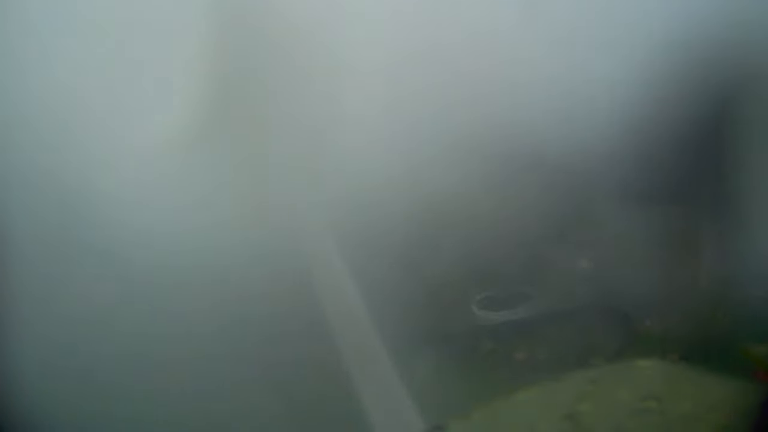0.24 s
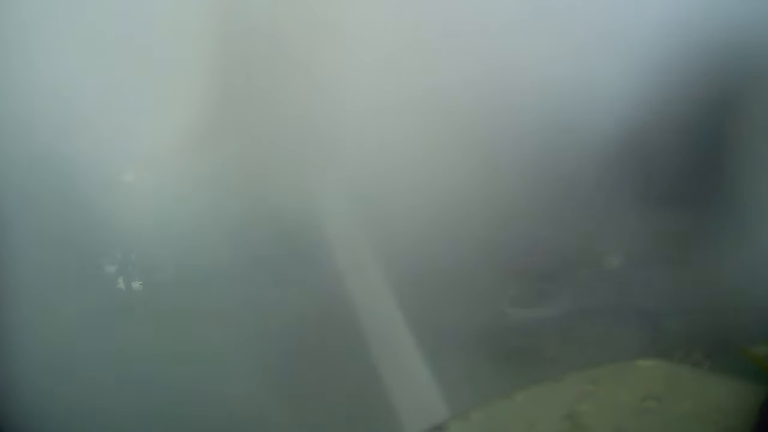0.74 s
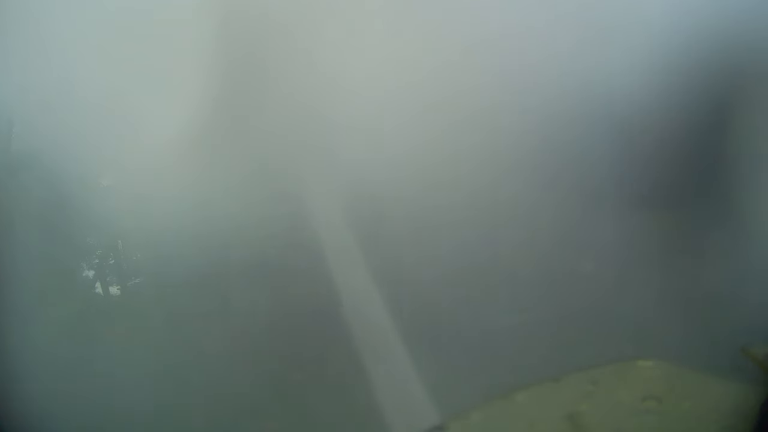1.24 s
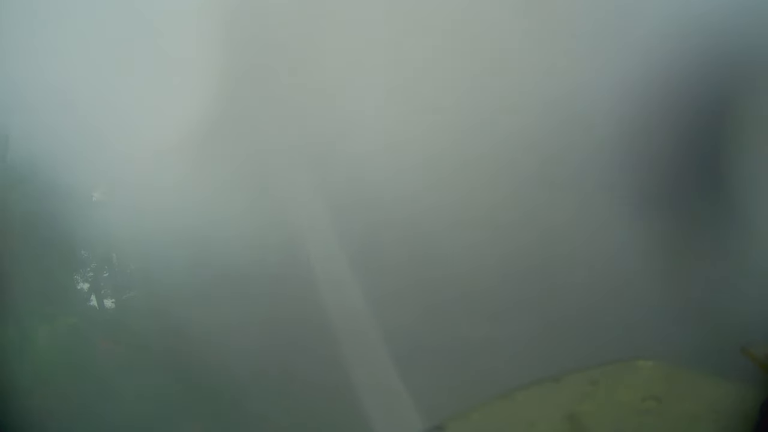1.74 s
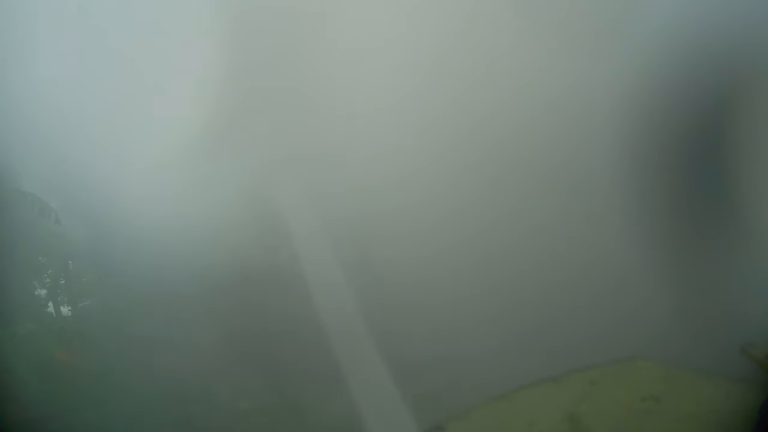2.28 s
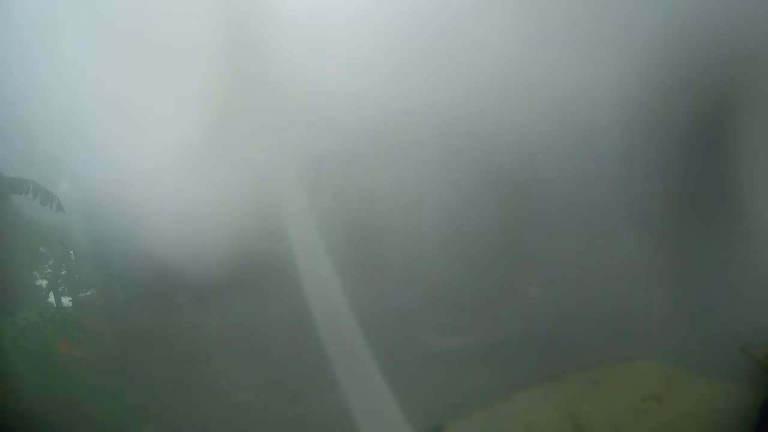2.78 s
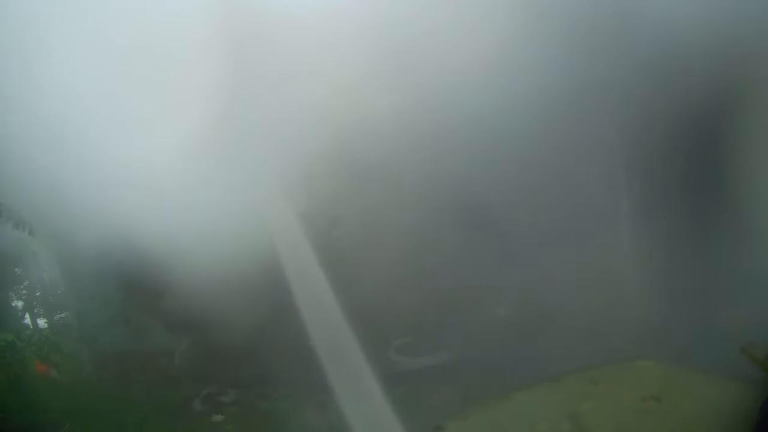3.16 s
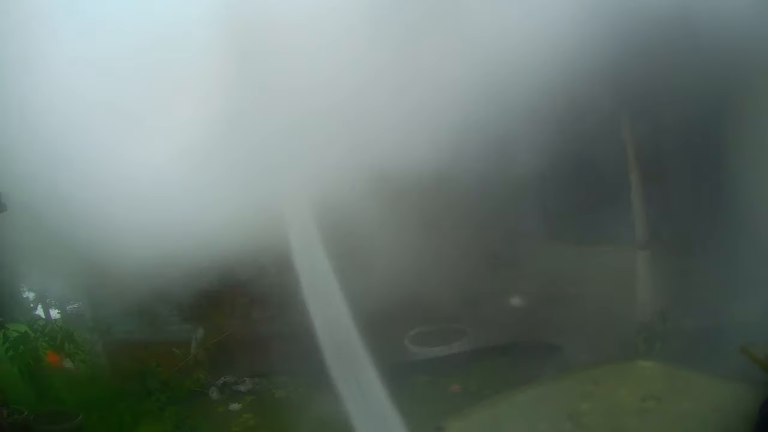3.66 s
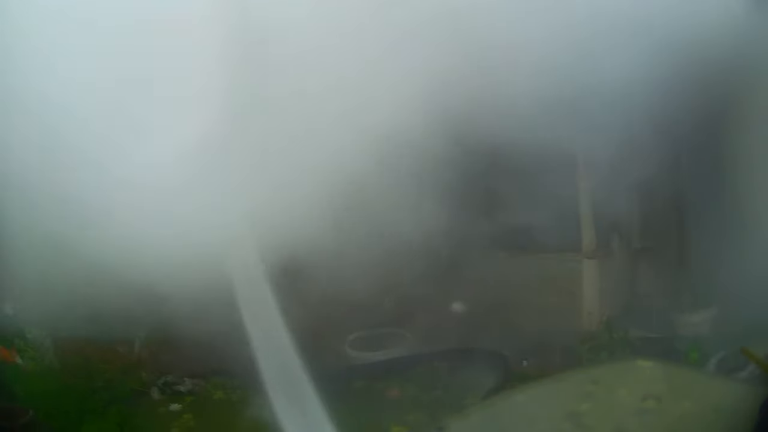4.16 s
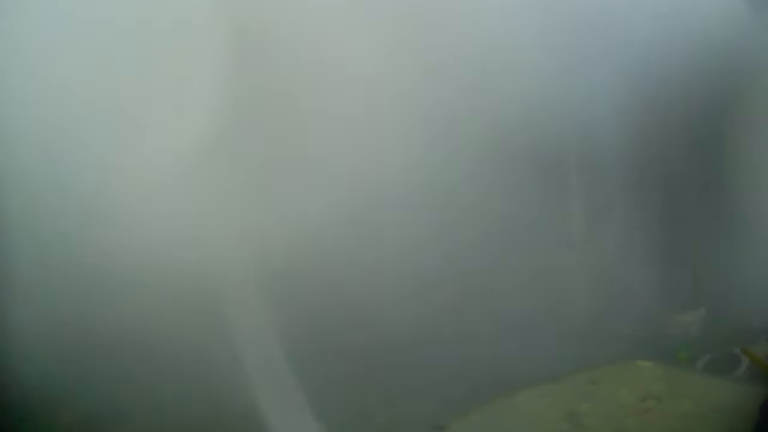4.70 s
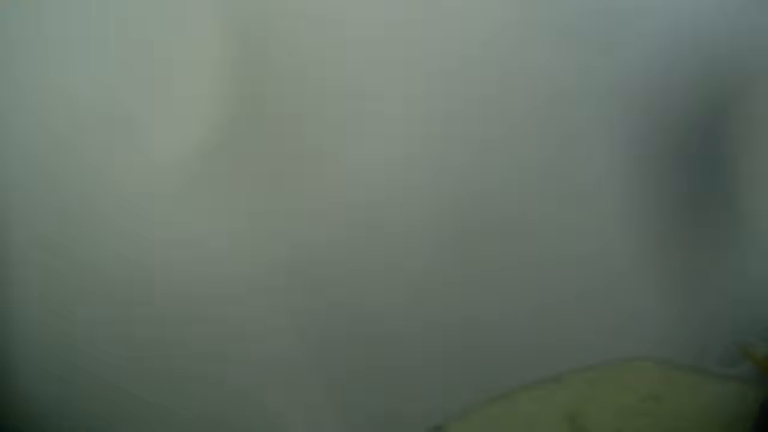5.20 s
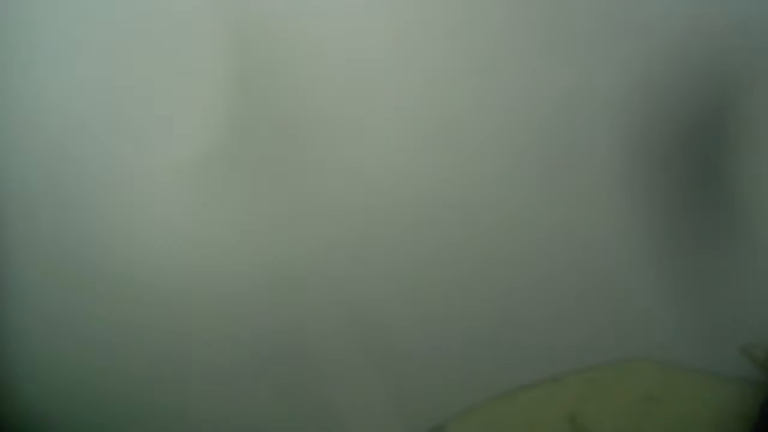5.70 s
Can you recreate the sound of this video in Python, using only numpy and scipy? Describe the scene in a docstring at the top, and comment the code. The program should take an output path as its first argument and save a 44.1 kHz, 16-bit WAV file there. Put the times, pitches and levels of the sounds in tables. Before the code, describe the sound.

Muffled, boxy hose water splatters and hisses, twice drumming louder on a close wall, with dull microphone bumps and a faint distant pump.

```python
"""Hosing down a smoking building

A jet of water sweeps over the building. It breaks into lumps that splash, drum and spray, and the
sound swells where it strikes a near wall. A pump drones far off. It is all heard from a camera
shut in its case, which colours the sound of the water and is bumped now and then."""
import sys
import numpy as np
from scipy import signal
from scipy.fft import rfft, irfft, next_fast_len
from scipy.io import wavfile
from scipy.ndimage import uniform_filter1d, map_coordinates

SR = 44100
rng = np.random.default_rng(int(sys.argv[2]) if len(sys.argv) > 2 else 0)


def unload_audio(sound):
    """Save the sound as a 16-bit wav file, at the path given as the first command line argument."""
    columns = np.transpose(np.atleast_2d(sound))
    # keep every value between -1 and 1, then stretch to whole-number steps
    steps = np.round(np.clip(columns, -1, 1) * 32767)
    wavfile.write(sys.argv[1], SR, steps.astype(np.int16))


N = 261954


def amp(db):
    """Turn decibels into a gain."""
    return 10 ** (np.asarray(db) / 20)


def unit(x):
    """Scale a sound to an average (rms) level of 1."""
    return x / np.sqrt(np.mean(x ** 2) + 1e-20)


def curves(rows):
    """Join timed rows with straight lines: one curve for each column after the time."""
    seconds, *columns = np.transpose(rows)
    return [np.interp(np.arange(N) / SR, seconds, column) for column in columns]


def wobble(rate):
    """A smooth curve through `rate` random points a second."""
    points = rng.standard_normal(int(N * rate / SR) + 4)
    return map_coordinates(points, [np.arange(N) * rate / SR])


def filtered(x, response):
    """Scale each frequency of a sound by response(hz)."""
    size = next_fast_len(N + SR // 2)
    return irfft(rfft(x, size) * response(np.fft.rfftfreq(size, 1 / SR)), size)[..., :N]


def bell(hz, centre, width):
    """A peak of height 1; its width is taken at half that height."""
    return 1 / (1 + (2 * (hz - centre) / width) ** 2)


def case_db(hz):
    """The shut case boosts some frequencies and muffles others."""
    # Each row: centre in Hz, width in Hz, boost or cut in dB.
    peaks_and_dips = [(792, 187, -11.5), (1590, 240, 4), (1984, 160, -3), (2260, 130, 2.5), (2850, 230, -7),
                      (3370, 83, -8.5), (3767, 540, 7), (4670, 930, -14), (5434, 630, 13), (6100, 200, -9),
                      (6590, 400, 9), (7400, 250, 1), (8670, 270, 8), (9850, 400, 9), (11300, 520, 8),
                      (12800, 330, -1), (14300, 500, 3)]
    return sum(db * bell(hz, centre, width) for centre, width, db in peaks_and_dips)


def rush(spectrum, patchy_db, cased=True):
    """Rushing noise of level 1, shaped by a spectrum, with random louder and softer patches."""
    grid = signal.stft(rng.standard_normal(N + 512), nperseg=512)[2]
    patches = uniform_filter1d(rng.standard_normal(grid.shape), size=5, axis=0)  # smooth over pitch
    patches = uniform_filter1d(patches, size=8, axis=1)  # and over time
    noise = signal.istft(grid * amp(patchy_db * unit(patches)), nperseg=512)[1][:N]
    points_hz, points_db = np.transpose(spectrum)
    colour_db = lambda hz: np.interp(np.log(hz + 1), np.log(points_hz), points_db, -120, -120)
    return unit(filtered(noise, lambda hz: amp(colour_db(hz) + cased * case_db(hz))))


def far_pump():
    """The far pump drones in fuzzy tones, each a narrow band of noise."""
    # Each row: pitch in Hz, width in Hz, level in dB.
    tones = [(98.2, 12, -58), (159.4, 25.6, -51), (364, 47, -55.5)]
    drone = np.zeros(N)
    for pitch, width, db in tones:
        drone += amp(db) * unit(filtered(rng.standard_normal(N), lambda hz: bell(hz, pitch, width)))
    return drone


def case_bumps():
    """The case rumbles. Each bump is a soft push that swings back and dies, in a swell of the rumble."""
    # Each row: start in seconds, peak in dB, pitch in Hz, rumble around the bump in dB.
    bumps = [(1.659, -38, 40, -50), (1.939, -31.5, 45, -44), (2.37, -38, 50, -54), (2.93, -41, 35, -50),
             (3.429, -30, 86, -43.5), (3.447, -24, 89.5, -39), (3.829, -30, 90, -42),
             (3.968, -36.5, 89.5, -50), (4.69, -36, 61, -46)]
    # Each row: frequency in Hz, relative strength in dB.
    rumble_spectrum = [(15, -29), (30, -3), (60, -4.5), (110, -5.5), (160, -8), (250, -19.5), (450, -38)]
    rumble_gain, swell_seconds = amp(-52), 0.13
    thuds = np.zeros(N + SR)
    t = np.arange(SR // 10) / SR
    for start, peak_db, hz, swell_db in bumps:
        push = np.sin(2 * np.pi * hz * t) * np.exp(-1.1 * hz * t)
        thuds[round(start * SR):][:len(t)] += amp(peak_db) * push / push.max()
        swell = amp(swell_db) * np.exp(-np.abs(np.arange(N) / SR - start) / swell_seconds)
        rumble_gain = np.hypot(rumble_gain, swell)  # hypot adds the two powers
    rumble = unit(amp(0.49 * wobble(6)) * rush(rumble_spectrum, patchy_db=0.8))
    return thuds[:N] + rumble_gain * rumble


def water_jet():
    """The jet breaks into lumps of water that shake splash, wall and spray together, over an even roar."""
    # The weight of water landing. Each row: time in seconds, splash level in dB.
    splash_levels = [(0.04, -44), (0.24, -50), (0.28, -38.5), (0.34, -30.5), (0.47, -35.5), (0.78, -32),
                     (0.92, -34), (1.12, -33), (1.28, -41.5), (1.56, -48), (1.84, -38.5), (2.02, -42),
                     (2.17, -47.5), (2.75, -46.5), (3.2, -42.5), (3.28, -50), (3.54, -47), (3.58, -36.5),
                     (3.65, -33), (3.77, -33.5), (3.84, -49), (4.0, -53.5), (4.06, -43.5), (4.13, -50.5),
                     (4.5, -48.5), (5.0, -46), (5.29, -43), (5.36, -50.5), (5.94, -45.5)]
    # Fine spray thrown back. Each row: time in seconds, level in dB.
    spray_levels = [(0.04, -65), (0.26, -65.5), (0.45, -54.5), (0.66, -53.5), (0.87, -59.5), (1.1, -52.5),
                    (1.45, -65), (1.62, -65.5), (1.84, -59), (2.02, -61), (2.18, -65.5), (2.37, -66.5),
                    (2.4, -56), (2.69, -69.5), (2.84, -58), (3.33, -61), (3.38, -68), (3.54, -64),
                    (3.58, -51), (3.65, -50), (3.78, -53), (3.9, -79), (4.0, -70), (4.05, -54), (4.13, -70),
                    (4.23, -66), (4.28, -61), (4.35, -65), (4.85, -64), (5.03, -58.5), (5.31, -59),
                    (5.37, -63.5), (5.94, -61)]
    # The jet crosses a near wall twice. Each row: time in seconds, drumming in dB, hollow ring in dB.
    near_wall = [(0.25, -55, -55), (0.33, -38, -35), (0.47, -41.5, -44.5), (0.78, -36.5, -36),
                 (0.95, -41, -39), (1.13, -40.5, -37.5), (1.3, -54, -52), (3.55, -76, -60),
                 (3.62, -41.5, -47), (3.77, -40, -44), (3.83, -74, -59)]
    # A slow change of colour. Each row: time in seconds, extra sizzle in dB, extra patter in dB.
    colour_drift = [(0, 0, -1), (1, -1, 0.5), (2, 0.5, 0), (3, 0, 1), (3.7, 2, -2.5), (4.4, 1.5, 0),
                    (5.1, 3, 1.5), (5.94, 1, 1)]
    # The colour of each layer. Each row: frequency in Hz, relative strength in dB.
    roar_spectrum = [(100, -45), (180, 3), (330, 3), (480, -3.5), (700, -20.5), (1100, -17), (1550, -8),
                     (2250, -18), (2700, -36), (3400, -25), (4500, -63)]
    splash_spectrum = [(650, -23), (850, -11.5), (1050, -7), (1250, -11), (1450, 1), (1700, -0.5),
                       (2000, -5.5), (2500, -19), (3000, -24), (3600, -72)]
    drum_spectrum = [(150, -7), (260, -8), (400, -1), (480, -1), (600, -5.5), (750, -10), (950, -28)]
    ring_spectrum = [(800, -39), (1000, 2), (1200, 8.5), (1300, 8.5), (1450, 1.5), (1700, -54)]
    patter_spectrum = [(1500, -46), (1950, 0.5), (2250, -1), (2700, -8), (3100, -16), (3700, -43)]
    spray_spectrum = [(2300, -25), (2900, -2.5), (3700, 3.5), (5000, -12.5), (6500, -18), (8000, -37),
                      (10000, -48), (15900, -50)]
    sizzle_spectrum = [(5500, -21), (7000, 4.5), (10000, -7.5), (14600, -9), (15300, -14), (15900, -20)]

    (splash_db,), (spray_db,) = curves(splash_levels), curves(spray_levels)
    extra_sizzle, extra_patter = amp(curves(colour_drift))
    near_drum, near_ring = amp(curves(near_wall))
    usual_splash_db, usual_spray_db = -42, -61

    def follow(base_db, per_splash, per_spray):
        """A gain that moves by so many dB for each dB of splash and spray, and wanders a little."""
        shift_db = per_splash * (splash_db - usual_splash_db) + per_spray * (spray_db - usual_spray_db)
        return amp(base_db + shift_db - 0.5 * wobble(9))

    def flutter(spectrum, flutter_db, patchy_db):
        """Rushing noise whose loudness shakes around a level of 1."""
        return unit(amp(flutter_db) * rush(spectrum, patchy_db))

    lumps = 0.34 * wobble(35) + 0.82 * wobble(90)
    drops = 2.6 * np.clip(wobble(160) - 1.1, 0, 1.3)  # now and then a big drop bursts above the rest
    splash = amp(splash_db) * flutter(splash_spectrum, 0.77 * lumps + 0.64 * wobble(11), patchy_db=0.5)
    # Far walls drum with the weight of the water.
    far_drum = follow(-49, per_splash=0.47, per_spray=-0.035)
    drum = np.hypot(near_drum, far_drum) * flutter(drum_spectrum, 1.2 * lumps, patchy_db=-0.4)
    # A heavy, dull strike rings hollow.
    strike_ring = follow(-55.5, per_splash=0.73, per_spray=-0.28)
    ring = np.hypot(near_ring, strike_ring) * flutter(ring_spectrum, 0.34 * lumps, patchy_db=-2.0)
    # Patter and sizzle mostly follow the fine spray.
    patter_gain = extra_patter * follow(-52.5, per_splash=0.18, per_spray=0.82)
    patter = patter_gain * flutter(patter_spectrum, 2.4 * lumps + 0.91 * drops, patchy_db=1.5)
    spray = amp(spray_db) * flutter(spray_spectrum, 0.66 * lumps + 2.0 * drops, patchy_db=-0.3)
    sizzle_gain = extra_sizzle * follow(-77.5, per_splash=-0.079, per_spray=0.83)
    sizzle = sizzle_gain * flutter(sizzle_spectrum, 1.5 * lumps + 0.77 * drops, patchy_db=-0.2)
    roar = amp(-46.5) * rush(roar_spectrum, patchy_db=1.5)
    return splash + drum + ring + patter + spray + sizzle + roar


def scene():
    """Jet, pump and bumps, mixed into one channel."""
    return (water_jet() + far_pump() + case_bumps())[None]


def record(dry):
    """The microphone adds its own hiss, and the very highest treble is cut off."""
    # Each row: frequency in Hz, relative strength in dB.
    hiss_spectrum = [(2000, -6), (5000, 0), (10000, -1), (14600, -1), (15200, -4), (15900, -10)]
    hiss = amp(-73) * rush(hiss_spectrum, patchy_db=0.5, cased=False)
    return filtered(dry + hiss, lambda hz: hz < 15750)


dry = scene()
out = record(dry)
unload_audio(out)
```